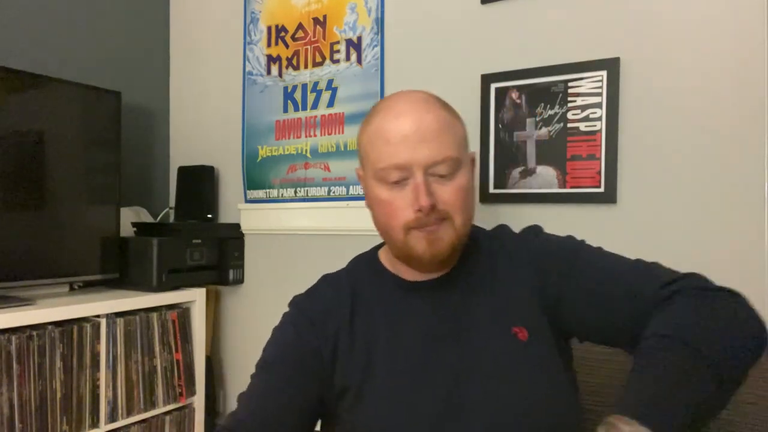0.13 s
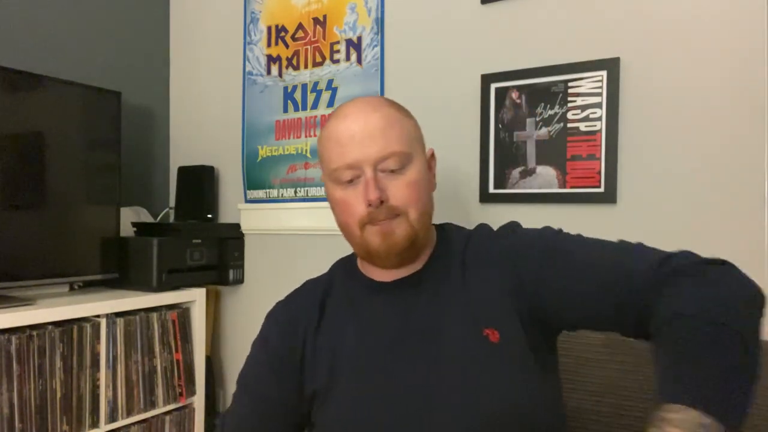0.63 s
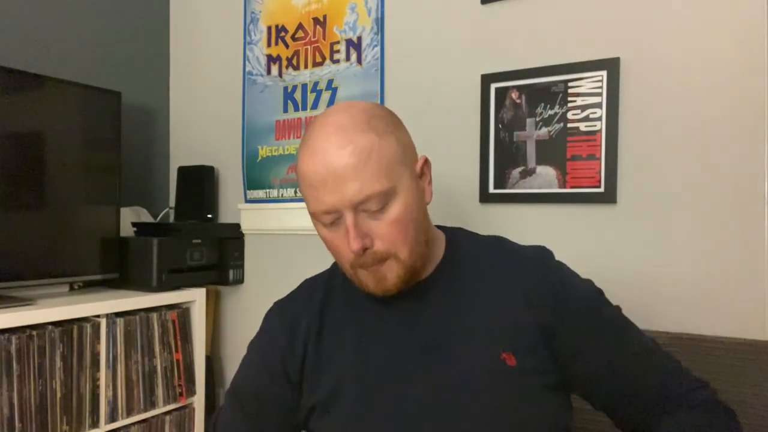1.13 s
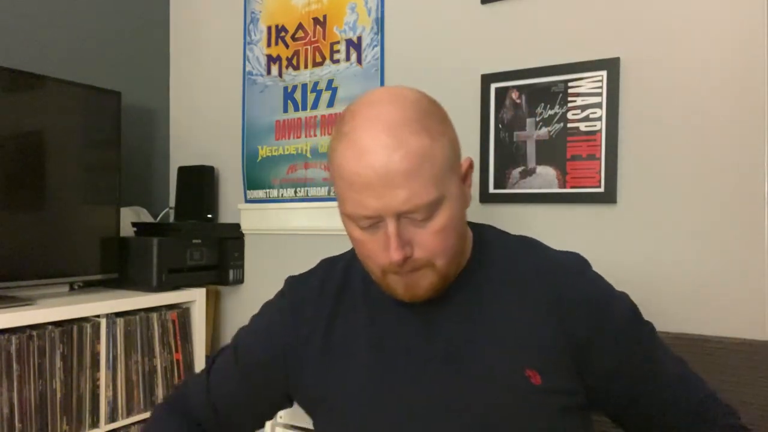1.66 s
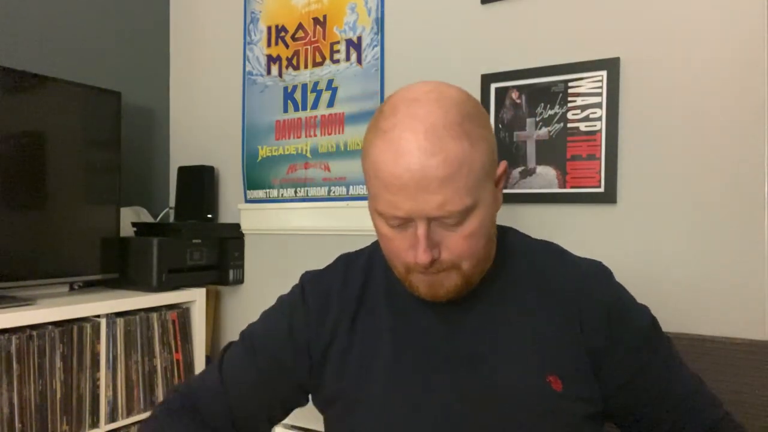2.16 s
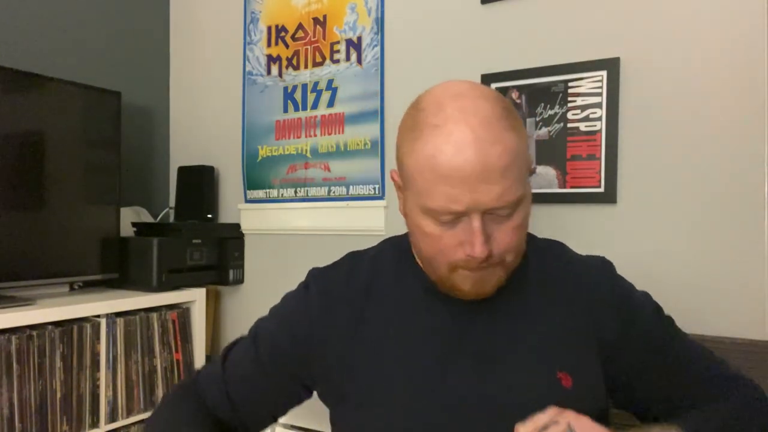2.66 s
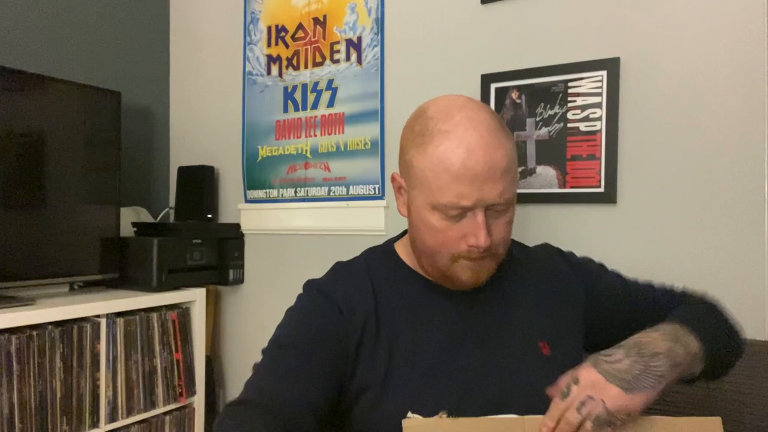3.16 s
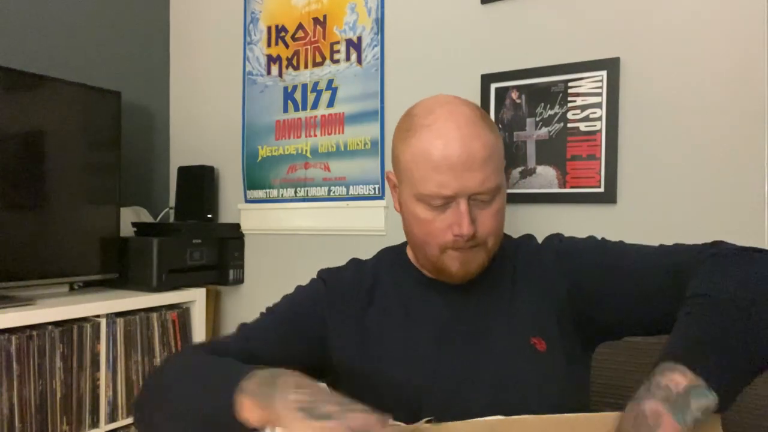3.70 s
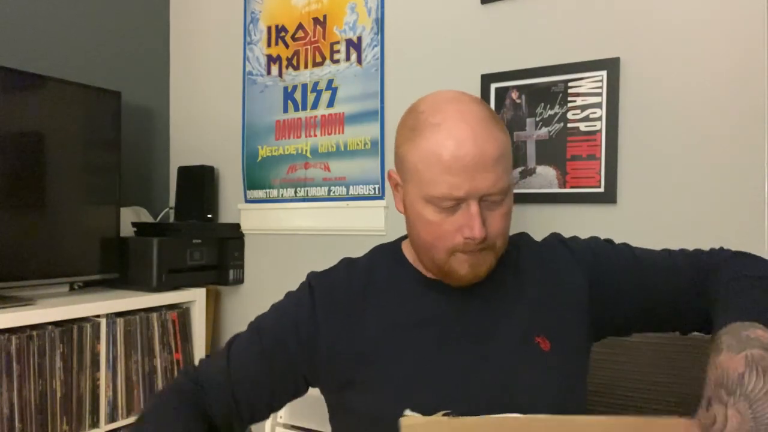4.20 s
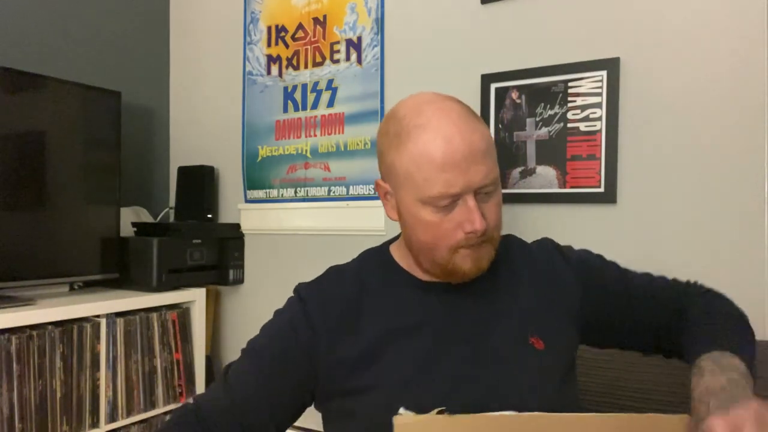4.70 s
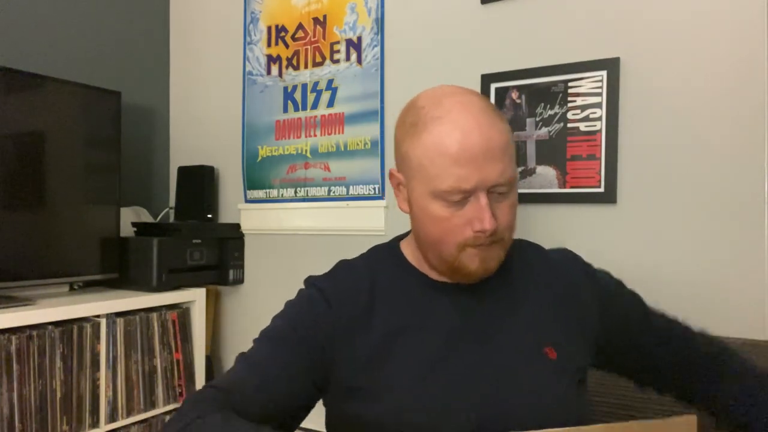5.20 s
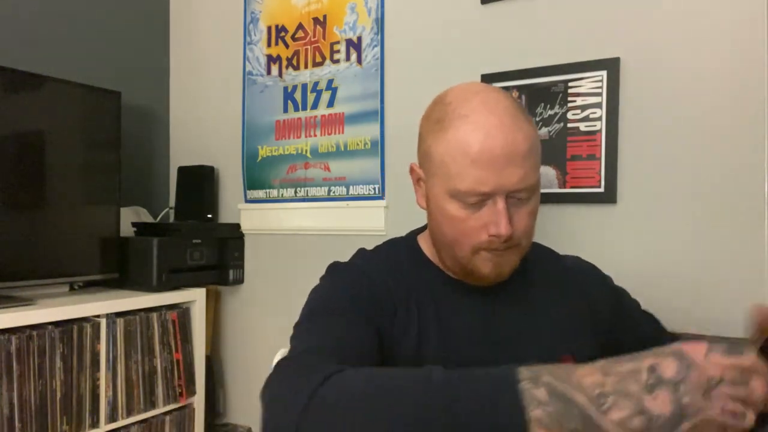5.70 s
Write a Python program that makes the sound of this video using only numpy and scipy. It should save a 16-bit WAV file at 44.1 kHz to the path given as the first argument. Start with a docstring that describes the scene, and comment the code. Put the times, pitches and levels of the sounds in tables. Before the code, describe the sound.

Close stereo microphones catch hands turning a cardboard box on a desk in a small furnished room. Soft rubbing and small ticks lead to a sharp knock at about 1.4 seconds, then a heavier clattering blow near 2.2. Bright ripping scrapes follow around 3.5, then scattered thuds and snaps, softer rubbing and finally almost silence.

```python
"""A cardboard box is turned, knocked, dragged and torn open on a desk in a small furnished room.
Stick-slip friction, as shaped noise, makes hands and flaps rub and tape and fibres rip with a bright hiss.
Blows excite damped panel modes that thud, with noise bursts for rattling flaps; edges groan, card snaps.
A short reverberant tail and a faint room tone surround the box.
Two close microphone ports hear it with a phase offset that changes with pitch."""
import sys
import numpy as np
from scipy import signal
from scipy.fft import rfft, irfft, next_fast_len
from scipy.io import wavfile
from scipy.ndimage import uniform_filter1d, map_coordinates

SR = 44100
rng = np.random.default_rng(int(sys.argv[2]) if len(sys.argv) > 2 else 0)


def gain_from_db(level_db):
    """Turn a decibel level (scalar or array-like) into a linear amplitude factor."""
    decades = np.asarray(level_db, float) / 20
    return 10 ** decades


def digitize_waveform(pressure):
    """Quantize a signal to 16-bit integers and store it at the path in sys.argv[1].

    Rows of a 2-D input are taken as channels; values are limited to [-1, 1].
    """
    field = np.atleast_2d(pressure).T
    bounded = np.clip(field, -1, 1)
    quanta = np.round(bounded * 32767).astype(np.int16)
    wavfile.write(sys.argv[1], SR, quanta)


N = 257544  # length [samples]

# Spectra give only the colour of a noise: (frequency [Hz], relative density [dB])
# room tone
HUSH_SPECTRUM = [(18, -42.5), (30, -14.5), (75, -2), (210, -8.5), (400, -12), (1200, -19), (1800, -30.5),
                 (3500, -34), (16000, -45)]
# rumble of the desk
DESK_SPECTRUM = [(20, -38.5), (40, -17), (60, 5.5), (100, 2.5), (160, -19), (400, -51.5)]
# flexing panels
FLEX_SPECTRUM = [(50, -52.5), (110, -8), (200, -12), (400, -6), (700, -17), (1500, -31.5), (3000, -74)]
# rubbing palms and flaps
RUB_SPECTRUM = [(120, -25.5), (300, -10), (700, -3.5), (1400, -2), (2500, -6.5), (4000, -11.5),
                (6000, -15.5), (9000, -22.5), (14000, -71.5)]
# ripping tape and fibres
RIP_SPECTRUM = [(800, -39.5), (2500, -10), (5000, -15), (7000, -14.5), (9500, -8.5), (12500, -11),
                (14000, -13), (15700, -12.5), (16100, -32), (17000, -49)]
# struck flaps
RATTLE_SPECTRUM = [(200, -18), (500, -3), (1000, -2.5), (1500, -10.5), (2500, -12), (3500, -26.5),
                   (6000, -35), (12000, -58.5)]
# breaking fibres
SNAP_SPECTRUM = [(1200, -32.5), (3000, 4), (5000, 1), (7000, 0), (9500, 1.5), (15700, -2), (16300, -18.5),
                 (17000, -62)]

# reverberation of the room: (frequency [Hz], t60 [s])
ROOM_DECAY = [(100, 0.16), (500, 0.33), (2000, 0.3), (8000, 0.26), (16000, 0.3)]
# likeness of the two channels: (frequency [Hz], correlation [-1 to 1])
CHANNEL_LIKENESS = [(60, 0.75), (300, 0.65), (1000, 0.5), (3000, 0.1), (6000, 0.2), (9000, 0.96),
                    (12500, 0.985), (16000, 0.93)]
# phase by which the left port leads the right: (frequency [Hz], lead [rad])
PORT_LEAD = [(0, 0), (690, -.3), (1720, .2), (3960, .8), (5000, 3.4), (6550, 3), (8270, 1.5), (9040, .2),
             (10200, -.2), (11800, -2.3), (12800, -3.14), (13700, -4.1), (15200, -6.3), (16700, -6.2)]
# modes of box panels and cavity; the ring of a blow stops abruptly after about 50 ms:
# (frequency [Hz], relative level [dB], t60 before this cut [s])
BOX_MODES = [(57.5, -11.5, 0.43), (91.5, -6, 0.14), (156, -1.5, 0.083), (249.4, -11, 0.13),
             (307, -5, 0.066), (414, -4, 0.062), (678, -8.5, 0.053), (800, -4, 0.013), (1110, -0.5, 0.015),
             (1228, -15, 0.036)]

# dry snaps of card and tape: (time [s], ring level [dB], ring frequency [Hz])
TICKS = [(0.1955, -46, 8000), (0.2795, -46.5, 10500), (0.2952, -17.5, 3270), (0.349, -46, 9000),
         (0.4413, -39.5, 8750), (0.8855, -36.5, 2170), (0.9077, -39.5, 4100), (1.042, -22.5, 1246),
         (1.4097, -14.5, 2670), (1.539, -22.5, 1305), (2.234, -13, 1270), (2.3363, -32.5, 5230),
         (2.421, -28, 1800), (3.633, -33, 6500), (3.8336, -33.5, 9140), (3.8776, -42.5, 9100),
         (4.0922, -29.5, 1500), (4.842, -42.5, 9000), (5.2198, -34, 8100), (5.222, -41.5, 1800),
         (5.3654, -35, 1425), (5.792, -54.5, 1524)]
# panel edges that stick and slip at a fairly even rate:
# (start [s], length [s], first frequency [Hz], last frequency [Hz], level [dB])
GROANS = [(0.01, 0.15, 1355, 1296, -55.5), (0.742, 0.055, 1430, 1390, -49.5),
          (1.264, 0.042, 330.5, 400, -35), (1.914, 0.036, 165, 168, -30), (2.326, 0.096, 800, 1742, -37.5),
          (2.383, 0.039, 727, 714, -33), (4.375, 0.079, 348.4, 379, -41), (4.545, 0.063, 749, 780, -45.5),
          (4.627, 0.049, 196, 185.4, -38)]
# knocks and snaps: (time [s], rattle level [dB], thud re rattle [dB], thud centre [Hz], snap re rattle [dB])
KNOCKS = [(0.269, -39, -0.5, 720, -4), (0.295, -26.5, -4.5, 154, -15), (0.528, -36, -4.5, 460, -9.5),
          (0.935, -32.5, -4, 98, -20), (0.959, -49.5, 16, 255, -30), (1.043, -31, 12, 654, -18),
          (1.153, -45, 19, 226, -28), (1.256, -49.5, 18, 414, -20), (1.306, -44.5, 24, 156, 3),
          (1.3995, -23, 0.5, 800, -27.5), (1.409, -8, 0.5, 678, -20), (1.537, -26.5, 0, 800, -21),
          (1.909, -34, 18, 397, -20), (2.005, -33, 16, 302, -11.5), (2.206, -15.5, 3.5, 335, -8.5),
          (2.213, -41.5, 15.5, 80, -27), (2.215, -25.5, 15, 131, -37), (2.229, -10.5, 4, 260, -32),
          (2.902, -35.5, 5.5, 182, -10), (3.831, -35.5, 3, 72, -15), (3.895, -31.5, 5.5, 75.5, -10),
          (4.0919, -21.5, -1, 667, 3), (4.18, -46.5, 17.5, 96, -30), (4.442, -44.5, 1, 700, -25),
          (4.454, -53, 22, 91.5, -23), (4.529, -50.5, 19, 161, 0), (4.983, -21, -1.5, 91.5, -8.5),
          (4.984, -45, 18, 430, -30), (5.103, -49.5, 24, 156, -31), (5.1882, -41, 15, 314, -16.5),
          (5.208, -46, 11, 253, -21.5), (5.339, -48, 12, 410, -3.5)]
# short drags and rips: (start [s], swell [ms], rub level [dB], rub centre [Hz], rip level [dB])
STROKES = [(0.078, 80, -44.5, 3970, -56), (0.614, 10.5, -36.5, 2350, -45), (0.63, 20, -49, 1460, -46.5),
           (1.276, 19.2, -32.5, 626, -40), (1.383, 23, -35.5, 2580, -38.5), (1.979, 9.6, -41, 465, -65.5),
           (2.204, 5.5, -15, 1900, -56.5), (2.361, 70, -36, 1590, -65), (2.913, 36, -31.5, 1050, -49),
           (3.114, 22.4, -48.5, 710, -49.5), (3.398, 49.5, -39, 1490, -30.5),
           (3.522, 6.9, -28.5, 790, -38.5), (3.534, 6.9, -30, 2520, -29.5), (3.635, 37, -42, 1500, -30.5),
           (3.719, 10, -25, 1260, -43), (4.625, 73, -41, 1940, -60), (4.954, 11, -44, 670, -66),
           (5.337, 48.6, -39, 1290, -70)]
# moves of the hands, levels at mid-move:
# (start [s], length [s], flexing level [dB], rubbing level [dB], ripping level [dB])
MOVES = [(0, 0.24, -52, -52.5, -69), (0.327, 0.15, -58.5, -58, -68), (0.425, 0.27, -57, -53, -55.5),
         (0.605, 0.2, -58, -47, -55), (0.868, 0.22, -52.5, -53, -71), (1.23, 0.25, -50, -59, -69.5),
         (1.366, 0.19, -51, -43.5, -55.5), (1.895, 0.25, -55, -63, -72), (2.19, 0.21, -45.5, -38, -58.5),
         (2.574, 0.24, -68.5, -59.5, -68), (2.908, 0.13, -41, -49.5, -61.5),
         (3.215, 0.051, -53.5, -77, -74.5), (3.3, 0.1, -51.5, -58.5, -66.5), (3.4, 0.03, -36.5, -33.5, -46),
         (3.523, 0.14, -38, -44, -37.5), (3.729, 0.2, -38, -45, -43), (4.086, 0.053, -39.5, -44.5, -41.5),
         (4.222, 0.086, -55.5, -54.5, -61.5), (4.356, 0.41, -52.5, -57, -63.5),
         (4.553, 0.084, -45.5, -54, -57.5), (4.623, 0.091, -59, -47.5, -66), (4.76, 0.026, -55.5, -79, -61),
         (4.926, 0.26, -54.5, -64.5, -77), (5.183, 0.19, -54, -61, -69), (5.328, 0.068, -49.5, -59.5, -81),
         (5.672, .03, -73, -88, -110)]
# how far the desk rumble lies under the flexing: (time [s], difference [dB])
DESK_BELOW_FLEX = [(0, 6), (1.1, 10.5), (2.2, 5.5), (3.0, 20), (3.3, 2.5), (4.0, 8.5), (5.3, 12.5)]

HUSH_DB = -74
LEFT_DB = 1.6  # left over right: the box lies a little to the left
TICK_S, TICK_CYCLES = 0.005, 4  # t60 of the edge; cycles by which the t60 of the ring is longer
TICK_EDGE_DB = 3  # noise of the edge, before its filter, over the ring
WAVER, GROAN_EDGE_S = 0.065, 0.013  # relative unsteadiness of the slip rate; softness of start and end
RATTLE_S, SOFTER_LONGER = 0.032, 0.05  # flap t60 after a -26 dB blow; softer blows rattle longer, share per dB
CRACKLE_PER_S, CRACKLE_DB, CRACKLE_S = 90, -6, 0.006  # mean rate; least level re rubbing; t60
FADE_MS, LONGER_BELOW_HZ = 65, 400  # t60 of a high stroke; low strokes last longer, twice as long at this pitch
GRIP_S, SAG_DB, LET_GO_DB_PER_S = 0.028, 3.5, 179.5  # a move takes hold, slackens, then dies away
REST_FLEX_DB, REST_RUB_DB, REST_RIP_DB = -66, -66.5, -76  # faint sound while the hands lie on the box
REST_ENDS_S, REST_FADES_DB_PER_S = 5.5, 419.5
DIP_START_S, DIP_END_S = 1.66, 1.9  # faint rubbing and ripping grow quieter for a moment


def unit(x):
    """Normalisation of power: scale to rms 1."""
    return x / np.sqrt(np.mean(x ** 2) + 1e-20)


def along(points, hz):
    """Interpolation of (frequency, value) points on a logarithmic pitch axis."""
    f, v = np.transpose(points)
    return np.interp(np.log(hz + 1), np.log(f + 1), v)


def filtered(x, response):
    """Linear filtering: the spectrum of x times a complex response of frequency."""
    m = next_fast_len(x.shape[-1] + 8192)
    return irfft(rfft(x, m) * response(np.fft.rfftfreq(m, 1 / SR)), m)[..., :x.shape[-1]]


def wobble(rate):
    """Band-limited fluctuation: a spline through random knots, rate of them a second."""
    knots = rng.standard_normal(int(N * rate / SR) + 4)
    return map_coordinates(knots, [np.arange(N) * rate / SR])


def room_tone():
    """Stationary noise: two independent Gaussian channels coloured by one spectrum."""
    noise = rng.standard_normal((2, N))
    return gain_from_db(HUSH_DB) * unit(filtered(noise, lambda hz: gain_from_db(along(HUSH_SPECTRUM, hz))))


def room(x):
    """Reverberation: convolution with decaying noise, redrawn for each third of a second."""
    step, out = SR // 3, np.zeros((2, N + 2 * SR))
    for start in range(0, N, step):
        hz, t, z = signal.stft(rng.standard_normal((2, SR // 2)), SR, nperseg=256)
        decay = gain_from_db(-60 * t / along(ROOM_DECAY, hz)[:, None])
        tail = signal.istft(z * decay, SR, nperseg=256)[1]
        wet = signal.fftconvolve(x[None, start:start + step], tail / np.linalg.norm(tail[0]), axes=1)
        out[:, start + 200:][:, :wet.shape[1]] += wet  # 200 samples of delay before the tail
    return out[:, :N]


def spread(pair):
    """Interchannel coherence: mid and side shares give unrelated signals the stated correlation."""
    turn = lambda hz: np.arccos(np.clip(along(CHANNEL_LIKENESS, hz), -1, 1)) / 2
    mid, side = filtered(pair, lambda hz: np.array([np.cos(turn(hz)), np.sin(turn(hz))]))
    return np.array([mid + side, mid - side])


def sides(pan_db):
    """Intensity panning: left and right gains that differ by pan_db."""
    return gain_from_db(np.array([pan_db / 2, -pan_db / 2]))


def ticks():
    """Impulse excitation: a broad noise edge, then one small patch of card rings for a few cycles."""
    out, t = np.zeros((2, N + SR)), np.arange(SR // 20) / SR
    for s, db, hz in TICKS:
        colour = lambda f: f / (f + hz) * (f < 16000) / (1 + (f / (3 * hz)) ** 4)
        noise = filtered(rng.standard_normal((2, len(t))), colour)
        edge = gain_from_db(TICK_EDGE_DB - 60 * t / TICK_S) * noise
        angle = 2 * np.pi * hz * t
        ring = gain_from_db(-60 * t / (TICK_S + TICK_CYCLES / hz)) * np.array([np.sin(angle), np.cos(angle)])
        out[:, round(s * SR):][:, :len(t)] += gain_from_db(db) * (edge + ring)
    return out[:, :N]


def groans():
    """Near-periodic stick-slip: rough gliding tones with a weak octave."""
    out, t = np.zeros(N), np.arange(N) / SR
    rough, rasp = wobble(150), wobble(300)
    for s, length, first_hz, last_hz, db in GROANS:
        slip_hz = np.interp(t, [s, s + length], [first_hz, last_hz]) * (1 + WAVER * rough)
        phase = 2 * np.pi * np.cumsum(slip_hz) / SR
        gate = np.clip(np.minimum(t - s, s + length + GROAN_EDGE_S - t) / GROAN_EDGE_S, 0, 1)
        steady = np.exp(-(last_hz / 900) ** 2)  # fast slipping breaks up into a coloured rasp
        tone = np.sin(phase) + 0.3 * steady * np.sin(2 * phase)
        out += gain_from_db(db) * gate * (steady + (1 - steady) * rasp) * tone
    return out * gain_from_db(0.85 * wobble(70))


def knocks():
    """Modal excitation: a blow rings the panels nearest its centre, rattles flaps and snaps fibres."""
    thuds, out, t = np.zeros(N + SR), np.zeros((2, N + SR)), np.arange(SR // 3) / SR
    hz, mode_db, t60 = np.transpose(BOX_MODES)[..., None]
    cut = np.exp(-(t / 0.052) ** 4)  # the ring stops abruptly after about 50 ms
    swell = 1 - np.exp(-t * hz / 1.05)  # a panel takes about a cycle to swing up
    for s, db, thud_db, centre_hz, snap_db in KNOCKS:
        rattle_s = RATTLE_S * np.exp(-SOFTER_LONGER * (db + 26))
        chance = rng.standard_normal((2, len(BOX_MODES), 1))
        noise = rng.standard_normal((2, 2, len(t)))
        near_db = mode_db + 0.22 * db * np.log2(hz / centre_hz) ** 2  # harder blows reach more panels
        near_db = near_db + 1.5 * chance[0]
        decay = gain_from_db(near_db - near_db.max() - 60 * t / t60)
        ring = swell * cut * decay * np.sin(2 * np.pi * hz * (1 + 0.039 * chance[1]) * t)

        flaps_die = gain_from_db(-60 * t / rattle_s)
        crack = 0.5 * gain_from_db(-60 * t / 0.039) + 0.5 * flaps_die  # two decays of the flaps
        body = unit(filtered(noise[0], lambda f: gain_from_db(along(RATTLE_SPECTRUM, f))))
        snap = gain_from_db(snap_db) * unit(filtered(noise[1], lambda f: gain_from_db(along(SNAP_SPECTRUM, f))))
        needle = 1.29 * gain_from_db(-60 * t / 0.012) + 0.3 * flaps_die  # a quick break on a weaker rattle
        front = body * crack * (1 - np.exp(-t / 0.00068))
        front = front + snap * needle * (1 - np.exp(-t / 0.0004))
        thuds[round(s * SR):][:len(t)] += gain_from_db(db + thud_db) * ring.sum(0)
        out[:, round(s * SR):][:, :len(t)] += gain_from_db(db) * front
    return thuds[:N], out[:, :N]


def panels(hz, damping):
    """Resonance: a sum of damped oscillator responses, widened by the hands that hold the box."""
    total = 0
    for k, (centre, db, t60) in enumerate(BOX_MODES):
        width = damping / t60
        total = total + (-1) ** k * gain_from_db(db) * 1j * hz * width / (centre ** 2 - hz * hz + 1j * hz * width)
    return total


def grit(spectrum, per_second, spread_db, smooth, ring, patchy_db):
    """Stick-slip friction: uneven slips on a smooth hiss, partly through panels, drifting in colour."""
    slips = rng.random((2, N)) < per_second / SR
    slips = slips * gain_from_db(spread_db * np.minimum(rng.exponential(size=(2, N)), 3.3))
    force = unit(slips * rng.standard_normal((2, N))) + smooth * rng.standard_normal((2, N))
    z = signal.stft(force, nperseg=256)[2]
    field = uniform_filter1d(rng.standard_normal(z.shape[1:]), size=4, axis=0)  # patches in pitch
    field = uniform_filter1d(field, size=12, axis=1)  # and in time
    force = signal.istft(z * gain_from_db(patchy_db * unit(field)), nperseg=256)[1][:, :N]
    return unit(filtered(force, lambda hz: gain_from_db(along(spectrum, hz)) * (1 + ring * panels(hz, damping=26.0))))


def crackle():
    """Poisson impulses: single fibres break at random, with uneven size and exponential decay."""
    breaks = rng.random(N) < CRACKLE_PER_S / SR
    breaks = breaks * gain_from_db(CRACKLE_DB + 4 * np.minimum(rng.exponential(size=N), 2.2))
    dying = signal.lfilter([1], [1, -gain_from_db(-60 / (CRACKLE_S * SR))], breaks)
    return dying * unit(filtered(rng.standard_normal((2, N)), lambda hz: gain_from_db(along(SNAP_SPECTRUM, hz))))


def strokes(rub, rip):
    """Resonant friction: each quick stroke swells and fades, ringing the patch under the hand."""
    out, t = np.zeros((2, N)), np.arange(SR // 3) / SR
    rub, rip = rub[:, ::-1], rip[:, ::-1]  # read backwards, for a texture apart from that of the moves
    for s, swell_ms, rub_db, centre_hz, rip_db in STROKES:
        part, top = slice(round(s * SR), round(s * SR) + len(t)), swell_ms / 1000
        fade_s = FADE_MS / 1000 * (1 + (LONGER_BELOW_HZ / centre_hz) ** 2)
        swell = gain_from_db(-14 * (1 - t / top)) * np.minimum(t / min(top, 0.004), 1)
        shape = np.where(t < top, swell, gain_from_db(-60 * (t - top) / fade_s))
        width = 40 + 0.0003 * centre_hz ** 2  # Hz: large panels groan narrowly, small patches hiss widely
        resonance = lambda f: 0.13 + 1j * f * width / (centre_hz ** 2 - f * f + 1j * f * width)
        patch = unit(filtered(rub[:, part], resonance))
        out[:, part] += shape * (gain_from_db(rub_db) * patch + gain_from_db(rip_db) * rip[:, part])
    return out


def moves():
    """Addition of powers: flexing, rubbing and ripping levels [dB] of moves that grip, sag and let go."""
    t = np.arange(N) / SR
    rest_db = np.array([REST_FLEX_DB, REST_RUB_DB, REST_RIP_DB])[:, None]
    power = gain_from_db(2 * (rest_db - REST_FADES_DB_PER_S * np.clip(t - REST_ENDS_S, 0, None)))
    dip_db = LET_GO_DB_PER_S * np.clip(t - DIP_START_S, 0, 0.05) * (t < DIP_END_S)
    power[1:] *= gain_from_db(-2 * dip_db)  # faint rub and rip only, about 9 dB down
    for s, length, *level_db in MOVES:
        sag_db = SAG_DB * (np.clip((t - s) / length, 0, 1) - 0.5)
        shape_db = -sag_db - LET_GO_DB_PER_S * np.clip(t - s - length, 0, None)
        grip = np.clip((t - s) / GRIP_S, 0, 1) ** 2 if s > 0 else 1
        power = power + gain_from_db(2 * np.array(level_db))[:, None] * (grip * gain_from_db(2 * shape_db))
    return 10 * np.log10(power + 1e-14)


def handling():
    """Friction and flexure: desk rumbles, panels flex, hands rub, fibres rip, under an unsteady grip."""
    flex_db, rub_db, rip_db = moves()
    desk_db = flex_db - np.interp(np.arange(N) / SR, *np.transpose(DESK_BELOW_FLEX))
    grip = wobble(25.02)
    desk = unit(filtered(rng.standard_normal((2, N)), lambda hz: gain_from_db(along(DESK_SPECTRUM, hz))))
    flex = grit(FLEX_SPECTRUM, 300, spread_db=2, smooth=0.8, ring=2.5, patchy_db=2)
    rub = grit(RUB_SPECTRUM, 2200, spread_db=2.0, smooth=0.92, ring=0.47, patchy_db=2.2)
    rip = grit(RIP_SPECTRUM, 2500, spread_db=1.6, smooth=0.39, ring=0, patchy_db=2.5)
    # rubbing and ripping share the unsteady grip; every level also wavers by itself
    rub_db = rub_db + 1.2 * grip + wobble(60)
    rip_db = rip_db + 1.8 * grip + 1.8 * wobble(90)
    desk_db = desk_db + 2 * wobble(12)
    flex_db = flex_db + 2 * wobble(18)
    steady = gain_from_db(desk_db) * desk + gain_from_db(flex_db) * flex
    steady = steady + gain_from_db(rub_db) * rub + gain_from_db(rip_db) * rip
    return steady + gain_from_db(rub_db) * crackle() + strokes(rub + 0.66 * flex, rip)


def scene():
    """Superposition: box sounds, their reverberation and a faint room tone."""
    moving, (thuds, rattles), snaps = handling(), knocks(), ticks()
    tones = thuds + groans()
    wet = room(gain_from_db(-2.0) * (tones + rattles[0]) + gain_from_db(-11.0) * snaps[0] + gain_from_db(-7.0) * moving[0])
    wet = filtered(wet, lambda hz: hz / (hz + 150))  # thuds travel through the desk and stir the air less
    return sides(LEFT_DB)[:, None] * (tones + spread(rattles + snaps + moving + wet + room_tone()))


def low_pass(x):
    """Removes everything above the highest recorded frequency."""
    return signal.sosfilt(signal.butter(12, 17100, fs=SR, output="sos"), x)


def record(dry):
    """Phase difference of two ports: each takes half the lead, and both miss the deepest bass."""
    half_lead = lambda hz: np.interp(hz, *np.transpose(PORT_LEAD)) / 2
    shift = lambda hz: np.exp(1j * np.array([half_lead(hz), -half_lead(hz)]))
    ports = filtered(dry, lambda hz: shift(hz) / (1 + (36 / (hz + 1)) ** 6))
    return low_pass(ports)


dry = scene()
out = record(dry)
digitize_waveform(out)
```